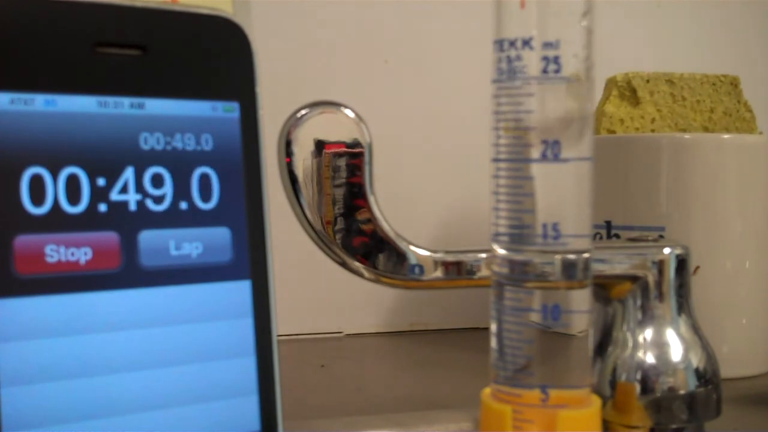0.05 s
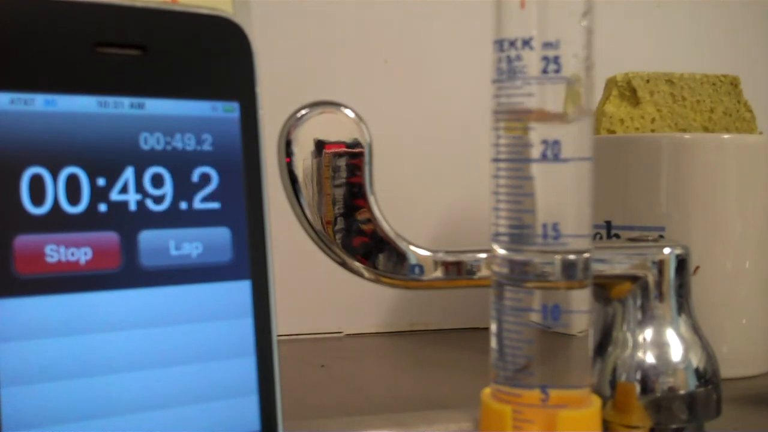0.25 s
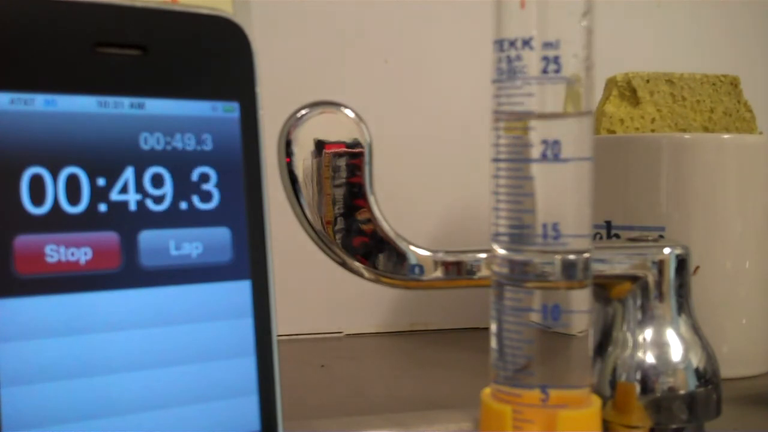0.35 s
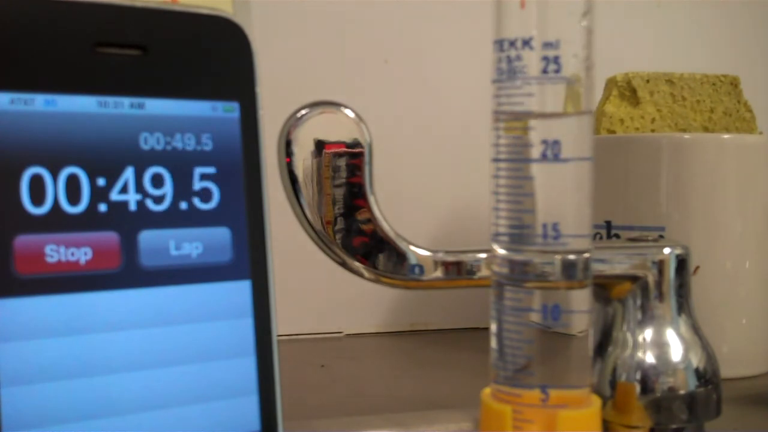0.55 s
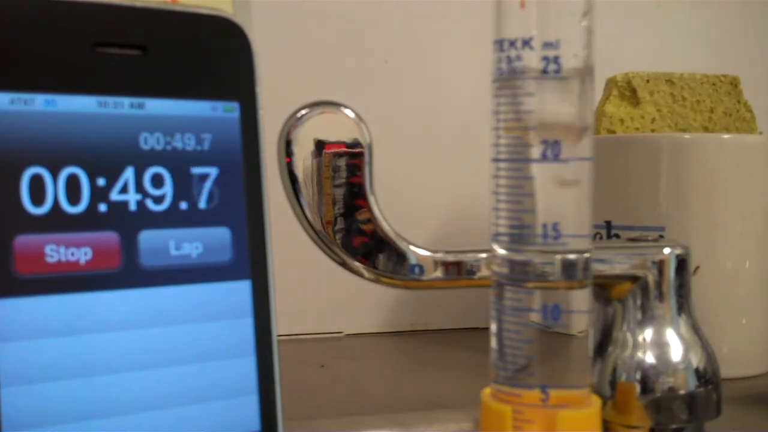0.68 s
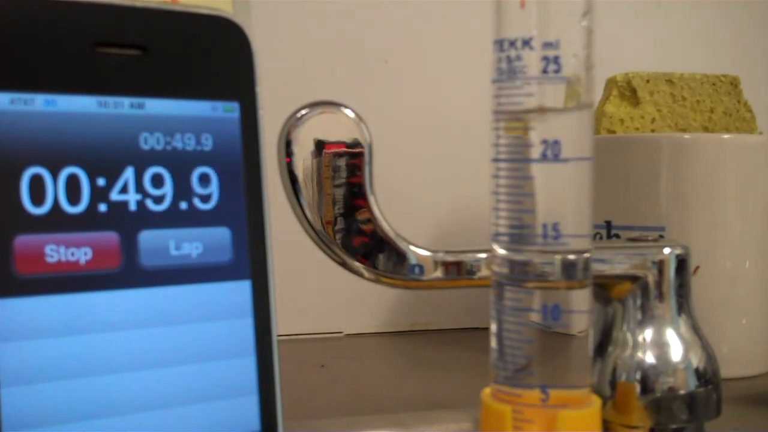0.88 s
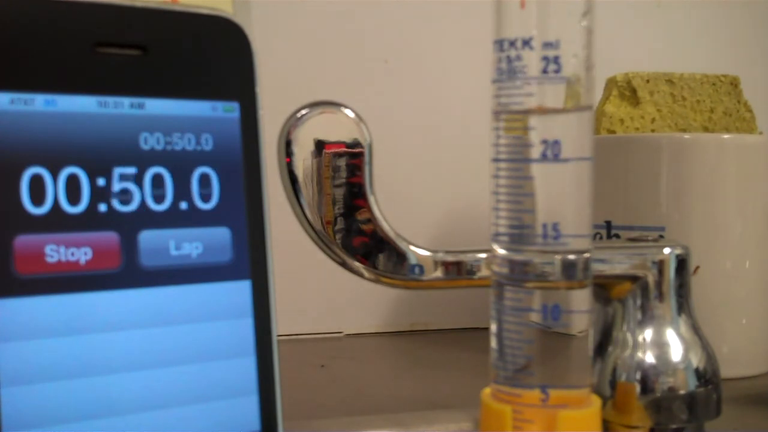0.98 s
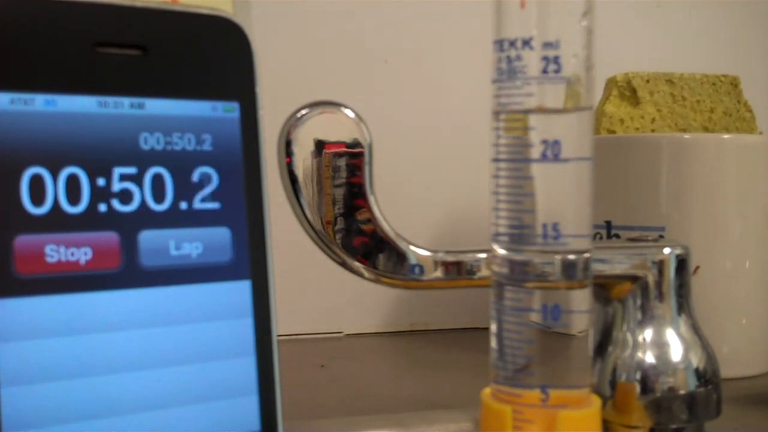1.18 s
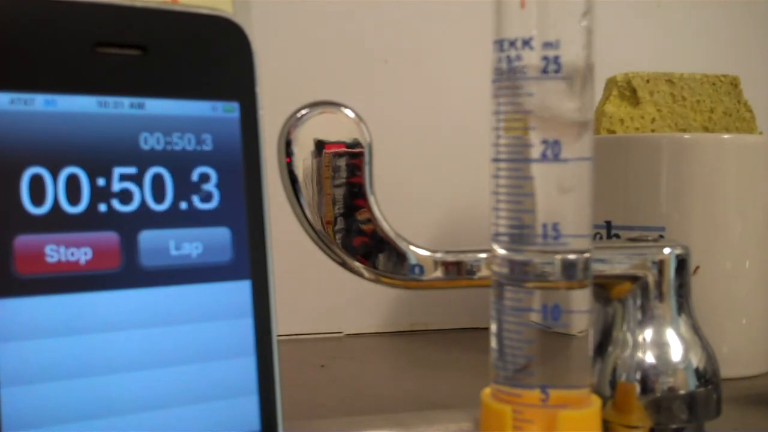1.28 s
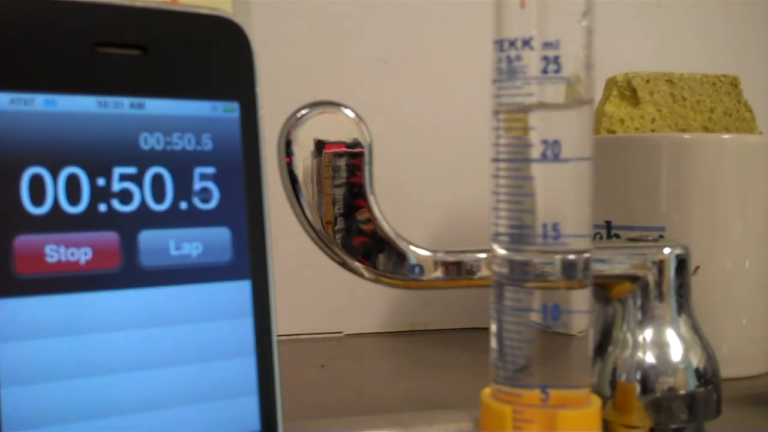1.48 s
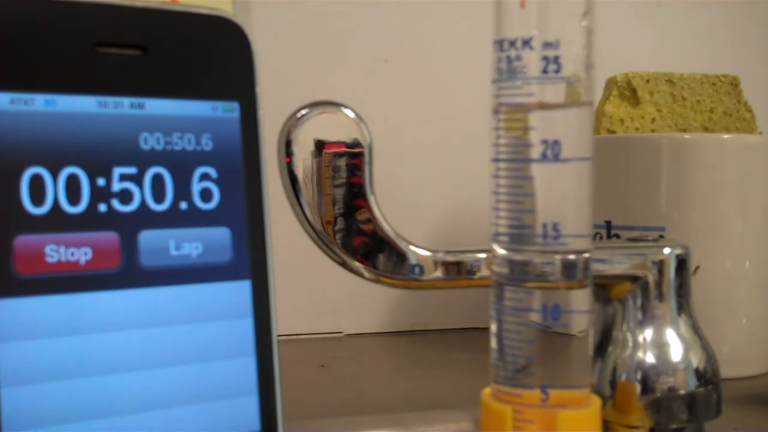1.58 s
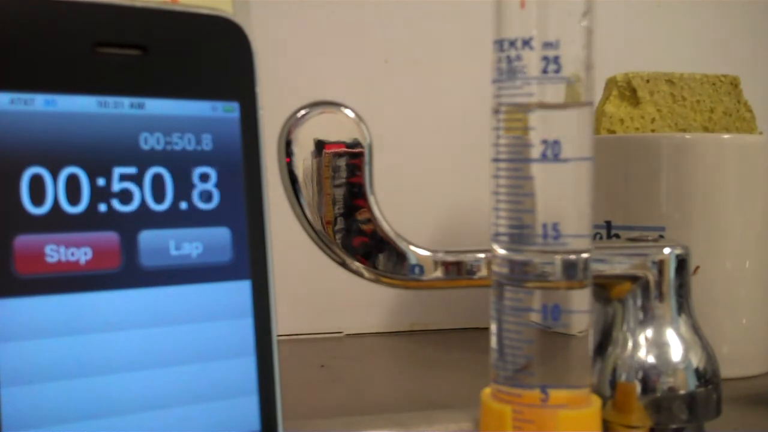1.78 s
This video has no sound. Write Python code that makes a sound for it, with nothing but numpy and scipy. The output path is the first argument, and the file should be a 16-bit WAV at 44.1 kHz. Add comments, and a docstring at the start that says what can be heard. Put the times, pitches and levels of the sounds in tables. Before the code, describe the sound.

Water drips from a tap into a narrow glass cylinder, close by in a small room. A sharp, high plink comes at about 0.2 seconds, a softer, lower one at 0.8, and another bright one at 1.4. Each is followed at once by a tiny rebound and a brief echo. Faint ventilation hums throughout, and a light hiss rises slightly after the last drop.

```python
"""A sink in a small room: a tap drips into a narrow glass measuring cylinder, close by, about every 0.6 s.
Each drop traps tiny bubbles that ping for a few milliseconds; some 30 ms later its rebound falls back
with a smaller plink. Each splash ticks and rings the cylinder faintly. Walls, sink and room reflect
the drips; ventilation and a faint hiss lie behind."""
import sys
import numpy as np
from scipy import signal
from scipy.fft import rfft, irfft, next_fast_len
from scipy.io import wavfile
from scipy.ndimage import map_coordinates

SR = 44100
rng = np.random.default_rng(int(sys.argv[2]) if len(sys.argv) > 2 else 0)


def wav_record(signal):
    """Record a signal, one row per channel, as 16-bit PCM in the file named by sys.argv[1]."""
    frames = np.transpose(np.atleast_2d(signal))
    bounded = np.clip(frames, -1, 1)
    # unit amplitude maps onto the largest positive 16-bit level
    quanta = np.round(bounded * 32767).astype(np.int16)
    wavfile.write(sys.argv[1], SR, quanta)


N = 81585

# air rush spectrum (frequency [Hz], relative density [dB])
AIR_SPECTRUM = [(15, -62.5), (25, -29.5), (36, -35), (48, -16), (102, -10), (136, -10.5), (177, -4.5),
                (219, -8.5), (257, -10), (286, -7.5), (318, -4.5), (363, -7.5), (425, -2.5), (485, -6),
                (741, -10), (802, -13.5), (991, -14.5), (1510, -20.5), (1640, -19.5), (2500, -25.5),
                (3930, -31), (6160, -28.5), (7820, -28.5), (8930, -35.5), (14000, -36)]
# air rush coherence (frequency [Hz], left-right correlation [0..1])
AIR_COHERENCE = [(60, 0.78), (500, 1), (1200, 0.55), (3000, 0.17), (7000, 0.13), (13000, 0.069)]
# air rush balance (frequency [Hz], left over right [dB])
AIR_BALANCE = [(60, -4), (230, -2.0), (910, -3), (3550, 1), (13800, 1.5)]
# ventilation hum lines (frequency [Hz], level [dB])
HUM_LINES = [(59.5, -71), (95, -67.5), (188, -65), (259, -62.5), (333, -63), (420, -62.5), (592, -74),
             (715, -65.5), (921, -70)]
# hiss envelope (time [s], level [dB])
HISS_ENVELOPE = [(0, -65.5), (.4, -66.5), (.6, -68), (1.4, -69.5), (1.65, -62), (1.85, -62.5)]
# hiss spectrum (frequency [Hz], relative density [dB])
HISS_SPECTRUM = [(1000, -28.5), (3500, 0), (7000, 1.5), (9000, -7), (14000, -11)]
# room decay (frequency [Hz], t60 [s])
ROOM_DECAY = [(1500, 0.23), (4500, 0.28), (7000, 0.19), (14000, 0.16)]
# room response (frequency [Hz], gain [dB])
ROOM_EQ = [(1500, 0.5), (3000, -2.5), (4100, 8), (4550, 4.5), (5100, 6), (6300, 1.5), (6900, -5), (7500, 5),
           (8500, 0.5), (14000, -4)]
# sink decay (frequency [Hz], t60 [s])
SINK_DECAY = [(1500, 0.021), (7000, 0.022), (14000, 0.013)]
# nearby surfaces (left delay [s], right delay [s], gain [dB])
WALL_TAPS = [(.0041, .0047, -25.5), (.0068, .0074, -23.5), (0.0125, .0131, -21.5), (.0238, .0226, -25.5)]
# air column and glass modes (frequency [Hz], level re splash [dB], t60 [s])
CYLINDER_MODES = [(1606, -18.5, 0.058), (4475, -23, .04), (8320, -20, 0.036)]
# water-on-water impacts (time [s], level [dB], t60 [s])
SPLASHES = [(0.2327, -23, 0.018), (0.2548, -35, 0.00818), (0.264, -31.5, 0.012), (0.4066, -38.5, .004),
            (0.8226, -45.5, 0.011), (0.8283, -37, .010), (0.8587, -43, 0.014), (1.0809, -34, 0.004),
            (1.4163, -33, .010), (1.42, -28.5, 0.018), (1.4457, -30, 0.016)]
# spray spectrum (frequency [Hz], gain [dB])
SPRAY_EQ = [(300, -43), (1000, -28), (1700, -12.5), (3000, -19), (4900, -11), (5500, -12), (6500, 1),
            (7800, -2.5), (9300, -10.5), (11500, -17.5), (13500, -15), (16000, -24)]
# trapped bubbles (time [s], pitch [Hz], level [dB], swell [s], t60 [s], glide [Hz/s])
BUBBLE_PINGS = [ (0.2325, 6930, 5.5, 0.00074, 0.01, 9999.5), (.2327, 3650, -34, 0.00071, 0.016, 3),
                (.2340, 8360, -27, 0.00081, .03, -0.5), (.2355, 2135, -18, 0.0027, 0.018, -26000),
                (0.2525, 6100, -32, .0004, .010, 0.5), (0.2617, 4517, -22, 0.00054, 0.024, 1.5),
                (0.2602, 4314, -25.5, 0.0012, 0.023, 5), (.2655, 4950, -29, .0004, .014, 0.5),
                (0.2617, 1750, -33, 0.00084, 0.022, -30000), (0.8242, 1596, -16.5, 0.0017, 0.045, 1.5),
                (0.823, 1430, -25.5, 0.0033, 0.044, -14000), (.8244, 2146, -39, 0.00023, 0.013, 0),
                (.8240, 6900, -43, 0.00055, 0.013, 3), (.8287, 6890, -18, 0.00046, 0.008, 100000),
                (.8287, 5910, -30, 0.00066, 0.013, 0), (0.8575, 8150, -49.5, 0.0013, 0.063, 0),
                (1.4160, 6820, 3, 0.00083, 0.0048, -2.5), (1.4190, 2176, -21, 0.0027, 0.021, -24000),
                (1.4197, 8500, -26.5, 0.00051, 0.012, 2), (1.4443, 7030, -7.5, 0.00077, 0.0042, 2),
                (1.4443, 6340, -18, 0.00083, 0.014, 0), (1.4450, 7870, -28, 0.00056, .016, 0),
                (1.446, 1800, -39, 0.0017, 0.0097, -20000), (1.5480, 4540, -49.5, .0006, 0.017, 0)]
# direct drip balance (frequency [Hz], left over right [dB])
DRIP_BALANCE = [(1500, .5), (2200, 0), (4500, 2), (6800, 6.3), (14000, 7.5)]


def amp(db):
    """Decibels to gain."""
    return 10 ** (np.asarray(db) / 20)


def unit(x):
    """Scale to rms 1."""
    return x / np.sqrt(np.mean(x ** 2) + 1e-20)


def along(points, hz):
    """Interpolate (Hz, value) points on a log axis."""
    knots_hz, values = np.transpose(points)
    return np.interp(np.log(hz + 1), np.log(knots_hz + 1), values)


def pan(db):
    """Stereo gains for a left-over-right level."""
    return amp(np.array([[.5], [-.5]]) * db)


def delay(hz, left_s, right_s):
    """Frequency response of a stereo delay."""
    return np.exp(-2j * np.pi * hz * [[left_s], [right_s]])


def wobble(rate_hz):
    """Smooth random curve, rate_hz knots a second."""
    knots = rng.standard_normal(int(N * rate_hz / SR) + 4)
    return map_coordinates(knots, [np.arange(N) * rate_hz / SR])


def filtered(x, response):
    """Apply response(hz) to x."""
    size = next_fast_len(x.shape[-1] + SR // 4)
    hz = np.fft.rfftfreq(size, 1 / SR)
    return irfft(rfft(x, size) * response(hz), size)[..., :x.shape[-1]]


def add(out, start_s, x):
    """Mix x into out at start_s."""
    part = out[:, round(start_s * SR):][:, :x.shape[-1]]
    part += x[..., :part.shape[1]]


def ventilation(rush_db=-49, hum_pan_db=-2.5, swell_db=0.5, waver_rad=1):
    """Steady rush of air plus hum lines wavering in level and phase."""
    def mid_side_gains(hz):
        angle_rad = np.arccos(along(AIR_COHERENCE, hz)) / 2
        return amp(along(AIR_SPECTRUM, hz)) * [np.cos(angle_rad), np.sin(angle_rad)]

    mid, side = filtered(rng.standard_normal((2, N)), mid_side_gains)
    rush = filtered(np.array([mid + side, mid - side]), lambda hz: pan(along(AIR_BALANCE, hz)))
    t = np.arange(N) / SR
    hum = np.zeros(N)
    for hz, db in HUM_LINES:
        gain = amp(db + swell_db * wobble(rate_hz=4))
        phase_rad = 2 * np.pi * hz * t + waver_rad * wobble(rate_hz=12.01)
        hum += gain * unit(np.sin(phase_rad))
    return amp(rush_db) * unit(rush) + pan(hum_pan_db) * hum


def hiss():
    """Faint treble hiss, rising after the last drip."""
    noise = filtered(rng.standard_normal((2, N)), lambda hz: amp(along(HISS_SPECTRUM, hz)))
    level_db = np.interp(np.arange(N) / SR, *np.transpose(HISS_ENVELOPE))
    return amp(level_db) * unit(noise)


def reverb(x, decay, gap_s):
    """Diffuse reflections after a gap; t60 varies with frequency."""
    hz, t, spectra = signal.stft(rng.standard_normal((2, SR // 2)), SR, nperseg=128)
    t60_s = along(decay, hz)[:, None]
    _, tail = signal.istft(spectra * amp(-60 * t / t60_s), SR, nperseg=128)
    tail /= np.linalg.norm(tail[0])
    tail = np.pad(tail, ((0, 0), (round(gap_s * SR), 0)))
    return signal.fftconvolve(x, tail, axes=1)[:, :N]


def room_reverb(tones, spray, spray_boost_db=5.5):
    """Room tail; spray radiates more widely than bubbles, so the room gets more of it."""
    send = filtered(tones + amp(spray_boost_db) * spray, lambda hz: amp(along(ROOM_EQ, hz)))
    return reverb(send, ROOM_DECAY, gap_s=0.0082)


def wall_echoes(x):
    """One early reflection per nearby surface."""
    def response(hz):
        return sum(amp(db) * delay(hz, left_s, right_s) for left_s, right_s, db in WALL_TAPS)

    return filtered(x, response)


def direct_path(x, left_lag_s=18e-6):
    """Direct sound: treble leans left, left channel lags slightly."""
    return filtered(x, lambda hz: pan(along(DRIP_BALANCE, hz)) * delay(hz, left_lag_s, 0))


def cylinder_ring(t):
    """Damped air column and glass modes, struck by each splash."""
    ring = sum(amp(db - 60 * t / t60_s) * np.sin(2 * np.pi * hz * t) for hz, db, t60_s in CYLINDER_MODES)
    out = np.zeros((1, N))
    for start_s, db, _ in SPLASHES:
        add(out, start_s, amp(db) * ring)
    return out


def splash_spray(t, gain_db=6.5):
    """Water hits water: one short bright noise tick per splash."""
    out = np.zeros((1, N))
    for start_s, db, t60_s in SPLASHES:
        envelope = amp(db + gain_db - 60 * t / t60_s)
        add(out, start_s, envelope * rng.standard_normal(len(t)))
    return filtered(out, lambda hz: amp(along(SPRAY_EQ, hz)))


def bubbles(t):
    """Trapped air pulsates: sines that swell and decay, some gliding."""
    out = np.zeros((1, N))
    for start_s, hz, db, swell_s, t60_s, glide_hz_per_s in BUBBLE_PINGS:
        attack = 1 - np.exp(-(t / swell_s) ** 2)
        envelope = attack * amp(db - 60 * t / t60_s)
        phase_rad = 2 * np.pi * np.cumsum(hz + glide_hz_per_s * t) / SR
        add(out, start_s, envelope * np.sin(phase_rad))
    return out


def scene():
    """Drips, reflections and background, in stereo."""
    event_time_s = np.arange(SR // 10) / SR
    tones = bubbles(event_time_s) + cylinder_ring(event_time_s)
    spray = splash_spray(event_time_s)
    drips = tones + spray
    sink = amp(db=-19) * reverb(drips, SINK_DECAY, gap_s=0.002)
    room = amp(db=-17.5) * room_reverb(tones, spray)
    return direct_path(drips) + wall_echoes(drips) + sink + room + ventilation() + hiss()


def record(dry):
    """Microphone square-law distortion in the treble, full-scale clip, band limit."""
    bend, distortion_above_hz, top_hz = 0.025, 3000, 14280
    distortion = bend * filtered(dry ** 2, lambda hz: hz > distortion_above_hz)
    clipped = np.clip(dry + distortion, -1, 1)
    return filtered(clipped, lambda hz: hz < top_hz)


dry = scene()
out = record(dry)
wav_record(out)
```